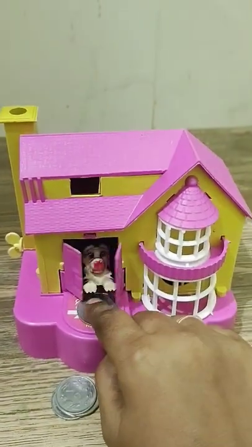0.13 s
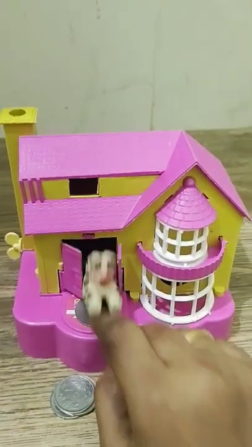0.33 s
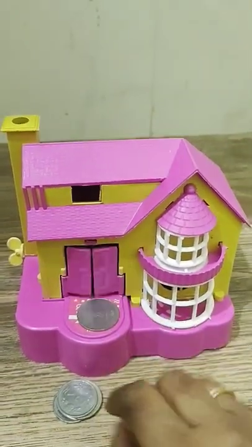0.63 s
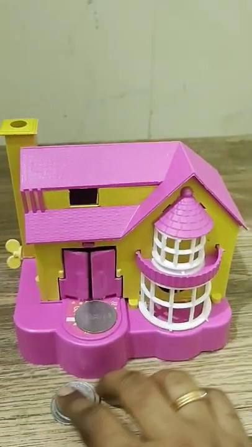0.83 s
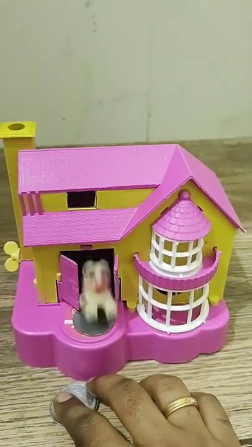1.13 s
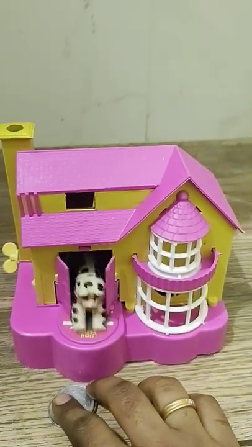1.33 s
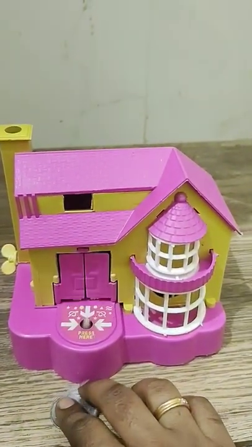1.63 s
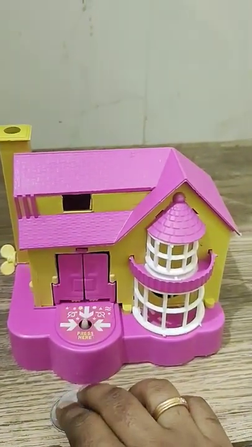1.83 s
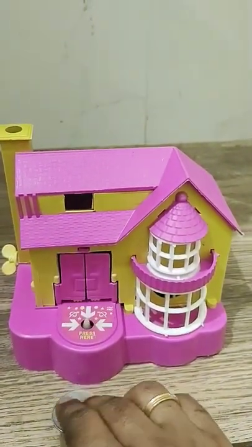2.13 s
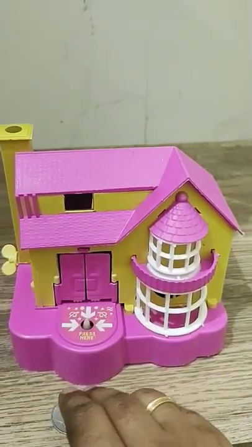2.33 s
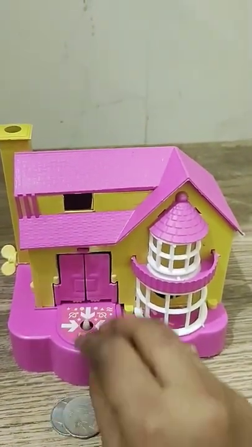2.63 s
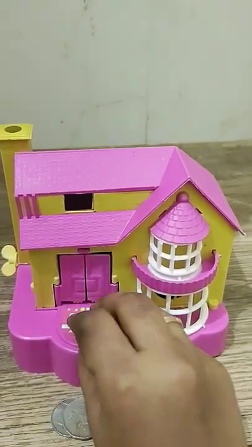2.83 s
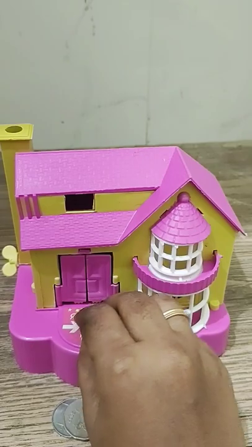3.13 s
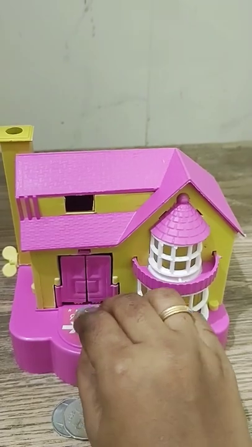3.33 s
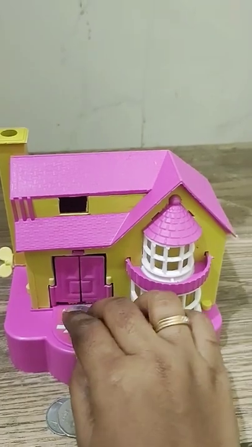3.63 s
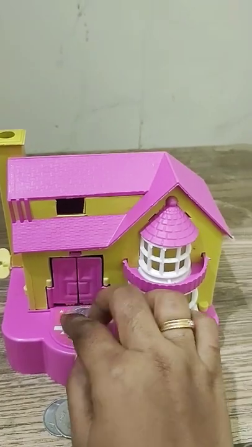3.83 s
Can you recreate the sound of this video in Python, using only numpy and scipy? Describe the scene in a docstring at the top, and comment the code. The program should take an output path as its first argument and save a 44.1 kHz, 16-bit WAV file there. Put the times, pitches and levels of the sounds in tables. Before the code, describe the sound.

A wind-up plastic coin bank whirrs and rattles loudly, its doors clacking, then runs down. Fingers slide and clink coins on a table and set one on the plastic tray, close by in a room with a faint hum.

```python
"""Wind-up coin bank on a table.

A hollow plastic toy runs: a spring drives a fast gear train that rattles the shell, its doors and
figure knock, and it runs down. Then fingers slide and clink coins and set one on the plastic tray.
Room hiss, a low rumble, a fan hum and gusts of air on the microphone lie below."""
import sys
import numpy as np
from scipy import signal
from scipy.fft import rfft, irfft, next_fast_len
from scipy.io import wavfile

SR = 44100
rng = np.random.default_rng(int(sys.argv[2]) if len(sys.argv) > 2 else 0)


def transcribe(u):
    """Save the signal u as a 16-bit wav file named by the first command-line argument.

    u: samples, shape (n,) or (channels, n), limited to [-1, 1]; the rate is SR.
    q: integer samples, one column per channel.
    """
    v = np.clip(np.atleast_2d(u).T, -1, 1)
    q = np.round(v * 32767).astype(np.int16)
    wavfile.write(sys.argv[1], SR, q)


N = 176400
TIME_S = np.arange(N) / SR
BIN_HZ = np.maximum(np.arange(N // 2 + 1) * SR / N, 10)


def amp(db):
    """Decibels to gain."""
    return 10 ** (np.asarray(db) / 20)


def unit_rms(x):
    """Scale to rms 1."""
    return x / np.sqrt(np.mean(x ** 2) + 1e-20)


def envelope(points, at_s=TIME_S):
    """Ride a fader between breakpoints."""
    return np.interp(at_s, *np.transpose(points))


def eq_curve(points):
    """Spread breakpoints over the spectrum on a log frequency axis."""
    hz, values = np.transpose(points)
    return np.interp(np.log(BIN_HZ), np.log(hz), values)


def drift(rate_hz):
    """Smooth random wander, rms about 1."""
    pole = np.exp(-80 * np.pi * rate_hz / SR)
    slow = signal.lfilter([1], [1, -2 * pole, pole * pole], rng.standard_normal(N // 40 + 2002))[2000:]
    return np.interp(np.arange(N) / 40, np.arange(len(slow)), unit_rms(slow))


# How alike left and right sound: freq_hz, correlation
STEREO_LIKENESS = [(60, .998), (125, 1), (250, 0.85), (500, 0.9), (1000, 0.57), (2000, 0.25), (4000, 0.22),
                   (12000, 0.24)]
def coloured(source, colour):
    """Give two unrelated signals an EQ and a stereo width; rms 1."""
    mid, side = rfft(source)
    alike = np.clip(eq_curve(STEREO_LIKENESS), 0, 1)
    stereo = np.sqrt(1 + alike) * mid + np.sqrt(1 - alike) * side * [[1], [-1]]
    low_cut = 1 + (colour[0][0] / BIN_HZ) ** 6
    return unit_rms(irfft(amp(eq_curve(colour)) / low_cut * stereo, N))


def noise(colour):
    """Stereo noise through an EQ; rms 1."""
    return coloured(rng.standard_normal((2, N)), colour)


def resonate(x, peaks, waver_db, waver_hz, order=1):
    """Parallel resonances, each swelling and fading on its own; rms 1."""
    out = 0
    for k, (hz, width_hz, db) in enumerate(peaks):
        r, ring = np.exp(-np.pi * width_hz / SR), x
        for _ in range(order):
            ring = signal.lfilter([1, 0, -1], [1, -2 * r * np.cos(2 * np.pi * hz / SR), r * r], ring)
        out += (-1) ** k * amp(db + waver_db * drift(waver_hz)) * unit_rms(ring)
    return unit_rms(out)


def strike(start_s, db, modes, spread_db, tilt_db=0, chatter_db=-60, chatter_t60_s=.06):
    """Short contacts with a dying chatter ring a set of modes; tilt_db brightens per octave."""
    out = np.zeros((2, N))
    luck = rng.standard_normal((len(start_s), len(modes), 3))
    lag_s = .0003 * rng.random((len(start_s), len(modes)))  # the contact smears the attack
    for k, (hz, mode_db, t60_s) in enumerate(modes):
        onsets = np.minimum((start_s + lag_s[:, k] * np.sqrt(700 / hz)) * SR, N - 1).astype(int)
        scatter_db = spread_db * (luck[:, k, 2] + .32 * luck[:, k, :2].T)  # per hit and per ear
        clicks = np.full((2, N), 1e-18)
        clicks[:, onsets] = (-1) ** k * amp(db + mode_db + tilt_db * np.log2(hz / 700) + scatter_db)
        tail = signal.lfilter([amp(chatter_db)], [1, -amp(-60 / (chatter_t60_s * SR))], clicks)
        force = clicks + tail * rng.standard_normal(N)
        r, w = amp(-60 / (max(t60_s, .003) * SR)), 2 * np.pi * hz / SR
        out += signal.lfilter([0, np.sin(w)], [1, -2 * r * np.cos(w), r * r], force)
    return out


def burst(start_s, db, t60_s, band_hz):
    """A band of noise dying away after each hit."""
    kicks = np.full(N, 1e-18)
    kicks[(start_s * SR).astype(int)] = amp(db)
    decay = signal.lfilter([1], [1, -amp(-60 / (t60_s * SR))], kicks)
    band = signal.butter(2, band_hz, "band", fs=SR, output="sos")
    return decay * signal.sosfilt(band, rng.standard_normal((2, N)))


# Room tone fader: time_s, level_db
HISS_LEVEL = [(1.98, -39), (2.18, -42.5), (2.68, -47.5), (2.94, -50), (3.13, -46.5), (3.3, -45),
              (3.44, -43.5), (3.89, -48.5), (4.0, -49.5)]
# Room tone EQ: freq_hz, gain_db
HISS_COLOUR = [(150, 2), (230, 0.5), (330, 4.5), (500, 4), (800, 3), (1300, 0.5), (2000, -2), (2900, -5.5),
               (3600, -24), (5000, -27), (9000, -36), (16000, -58)]
# Low end of the room: freq_hz, gain_db
RUMBLE_COLOUR = [(15, -10), (30, 9), (50, -18), (62, -7), (80, 15.5), (100, 24), (125, 21.5), (160, 10.5),
                 (200, -25)]
def room_tone():
    """A dull, faintly flickering hiss over a steady rumble."""
    hiss = amp(envelope(HISS_LEVEL) + .6 * drift(5.4)) * noise(HISS_COLOUR)
    return hiss + amp(-54) * noise(RUMBLE_COLOUR)


# Swells of moving air: time_s, level_db
GUST_LEVEL = [(0.0, -33.5), (0.12, -38.5), (0.41, -39.5), (0.46, -28.5), (0.57, -29.5), (0.74, -36.5),
              (0.79, -30), (0.92, -34.5), (1.1, -44), (1.45, -48), (2.1, -49.5), (2.4, -46.5), (3.03, -51),
              (3.07, -34.5), (3.14, -34), (3.25, -35.5), (3.36, -38), (3.45, -34.5), (3.62, -41.5),
              (3.66, -48.5), (3.8, -44), (4.0, -51)]
# Bass-heavy wind EQ: freq_hz, gain_db
GUST_COLOUR = [(15, -40), (30, -17), (50, -11), (60, 2), (68, 11), (82, 3), (99, 10), (120, 2), (150, 1.5),
               (180, -10.5), (220, -14), (400, -11.5), (800, -55)]
def gusts():
    """Air buffets the microphone in low puffs."""
    return amp(envelope(GUST_LEVEL) + .18 * drift(12)) * noise(GUST_COLOUR)


def fan_hum(pitch_hz=199.2, level_db=-49.5):
    """A fan holds one low tone whose level wavers slightly."""
    return np.sqrt(2) * amp(level_db + .4 * drift(16)) * np.sin(2 * np.pi * pitch_hz * TIME_S)


# The rattle, from release to run-down: time_s, level_db
RATTLE_LEVEL = [(0.068, -56), (0.082, -27.5), (0.342, -23.5), (0.422, -25.5), (0.45, -24.5), (0.541, -22),
                (0.685, -24), (0.842, -22), (1.101, -22.5), (1.303, -24.5), (1.396, -20.5), (1.444, -25.5),
                (1.472, -21.5), (1.51, -26), (1.628, -22.5), (1.721, -22), (1.806, -22), (1.855, -25.5),
                (1.89, -35), (1.93, -43), (1.96, -59), (2.0, -70), (2.1, -96)]
# Rattle EQ: freq_hz, gain_db
RATTLE_COLOUR = [(530, -99), (900, -10), (1510, -5.5), (1640, -2), (2220, -4), (5280, -5), (5820, -4),
                 (8660, -9), (14900, -9.5), (16000, -12)]
# Shell resonances the teeth excite: pitch_hz, width_hz, gain_db
SHELL_PEAKS = [(1066, 80, -4), (1440, 50, -4), (1620, 60, 0), (1790, 60, 2), (2510, 70, -3), (2724, 50, -3),
               (3500, 120, -3), (4620, 50, -2), (4970, 60, 2), (5400, 120, -2), (5650, 90, -2),
               (5950, 60, 1), (7430, 90, -12)]
# How hard the load makes the shell ring: time_s, gain_db
SHELL_LOAD = [(0.07, 6), (0.4, -4.5), (0.7, -1.5), (0.85, 3), (1.15, -1), (1.4, -4.5), (1.5, -3),
              (1.75, 1.5), (1.9, 6)]
# Resonances of the hollow body: pitch_hz, width_hz, gain_db
BOOM_PEAKS = [(556, 100, -1), (682, 86, 5), (792, 102, 2), (837, 56, 0.5), (338, 28, -14)]
# The boom, lingering after the stop: time_s, level_db
BOOM_LEVEL = [(0.068, -24), (0.132, -32.5), (0.256, -33), (0.5, -33), (0.842, -32), (0.988, -33),
              (1.2, -34), (1.466, -37), (1.65, -34.5), (1.73, -33.5), (1.82, -36), (1.88, -39),
              (1.95, -43.5), (2.05, -62.5), (2.4, -52.5), (2.75, -66.5), (3.0, -81)]
def gear_train(teeth_per_s=14000):
    """Dense, uneven tooth contacts rattle brightly, ring the shell and make the hollow body boom."""
    start_s = RATTLE_LEVEL[0][0]
    fade_in = np.interp(TIME_S, [start_s, start_s + .0053], [0, 1])
    force_db = 2 * np.minimum(rng.exponential(1, (2, N)), 5)
    teeth = amp(force_db) * rng.choice([-1, 1], (2, N))
    teeth *= rng.random((2, N)) < teeth_per_s / SR
    teeth *= amp(.64 * (drift(22) + drift(135)))  # the level flickers
    drive = coloured(teeth, [(200, 0), (16000, 0)])
    rattle = amp(2) * coloured(teeth, RATTLE_COLOUR)
    shell = amp(envelope(SHELL_LOAD) - 7) * resonate(drive, SHELL_PEAKS, waver_db=3, waver_hz=12)
    boom = amp(envelope(BOOM_LEVEL) + 3) * resonate(drive, BOOM_PEAKS, waver_db=.5, waver_hz=4.7, order=2)
    return fade_in * (amp(envelope(RATTLE_LEVEL)) * (rattle + shell) + boom)


# Knocks on the shell: start_s, level_db, tilt_db_per_octave, thud_offset_db
KNOCKS = [(0.0725, -22, -2, -22), (0.0765, 2, -2, -18), (0.086, -9, -1, -12), (0.118, -13, -4, -13),
          (0.139, -12, 0, -9), (0.258, -16, 0, -9), (0.473, -13, -1, -9), (0.606, -12, 0, -10),
          (0.788, -10, 0, -13), (0.979, -15, 0, -13), (1.3665, -8, -4, -23), (1.3705, -14, 5, -20),
          (1.3765, -7, -4, -23), (1.405, -15, 0, -22), (1.459, -15, -1, -17), (1.750, -3, 0, -7),
          (1.760, -17, 3, -8), (1.7845, -14, 4, 0), (1.788, -15, 4, -8), (1.798, -5, -2, -14),
          (1.848, -14, -2, -12), (1.902, -10, -3, -15)]
# Dry ring of struck plastic: pitch_hz, gain_db, t60_s
SHELL_MODES = [(500, -12, .02), (684, 0, .03), (800, -2, .025), (1040, -8, .025), (1300, -9, .02),
               (1610, -7, .025), (2000, -9, .02), (2500, -9, .02), (3000, -11, .015), (3500, -12, .015),
               (4200, -15, .012), (4950, -17, .01)]
# Thud of the doors: pitch_hz, gain_db, t60_s
DOOR_MODES = [(325, -10, .045)]
def knocks():
    """Doors, figure and catch hit their stops: the shell clacks and the doors thud."""
    start_s, db, tilt_db, thud_db = np.transpose(KNOCKS)
    clack = strike(start_s, db - 6.5, SHELL_MODES, spread_db=-.5, tilt_db=tilt_db)
    return clack + strike(start_s, db + thud_db, DOOR_MODES, spread_db=-2)


def loose_parts(ticks_per_s=70):
    """Small parts tick against the shell while the gears run, following the level of the boom."""
    start_s = np.arange(RATTLE_LEVEL[0][0], RATTLE_LEVEL[-1][0], 1 / ticks_per_s)
    start_s += rng.uniform(0, 1 / ticks_per_s, len(start_s))
    return strike(start_s, envelope(BOOM_LEVEL, start_s) - 5.5, SHELL_MODES, spread_db=5.5, tilt_db=-3)


# Sliding strokes: time_s, level_db
RUB_LEVEL = [(1.95, -78), (2.1, -77), (2.19, -66), (2.27, -89), (2.32, -56), (2.34, -58.5), (2.44, -62.5),
             (2.6, -64), (2.7, -74), (3.04, -80), (3.12, -57), (3.25, -58.5), (3.36, -71), (3.47, -59),
             (3.56, -57), (3.7, -69), (4.0, -81.5)]
# Friction EQ: freq_hz, gain_db
RUB_COLOUR = [(2500, 1), (4500, 1), (6500, -6), (9000, -4.5), (12000, -32), (16000, -18)]
# Treble shelf, brighter for coins on wood than for skin on plastic: time_s, gain_db
RUB_TREBLE = [(2.0, 1), (2.5, 2), (2.9, -13), (4.0, -19)]
def rubbing():
    """Fingers and coins slide over table and tray with a grainy hiss."""
    friction = noise(RUB_COLOUR)
    dull = signal.sosfilt(signal.butter(2, 8000, fs=SR, output="sos"), friction)
    treble = amp(envelope(RUB_TREBLE)) * (friction - dull)
    return amp(envelope(RUB_LEVEL) + 1.3 * drift(30)) * (dull + treble)


# Coin meets coin: start_s, level_db, ring_offset_db
CLINKS = [(2.318, -53, -1), (2.348, -30, -5), (2.358, -46, 0), (2.440, -56, 2), (2.498, -29.5, 6),
          (2.508, -40.5, 4), (2.521, -40, 3), (2.534, -38, 7)]
# High ring of a coin: pitch_hz, gain_db, t60_s
COIN_MODES = [(4500, -19, .01), (5900, -24, .01), (7400, -18, .012), (8300, -14, .012), (9100, -8, .012),
              (9750, -6, .015), (10250, -7, .012), (10700, -7, .012), (11170, -8, .015), (11650, -10, .11),
              (11740, -13, .06), (13000, -11, .01), (14200, -12, .01), (15200, -14, .01)]
def coin_clinks():
    """Coins touch with a sharp crack, a ring and a sizzling metallic tail."""
    start_s, db, ring_db = np.transpose(CLINKS)
    ring = strike(start_s, db + ring_db - 11, COIN_MODES, spread_db=3.5, chatter_db=-17)
    crack = burst(start_s, db - 5, t60_s=.012, band_hz=(7000, 16000))
    sizzle = burst(start_s, db + ring_db - 12, t60_s=.18, band_hz=(8800, 12900))
    return ring + crack + sizzle


# Coin meets tray: start_s, level_db, tilt_db_per_octave
TRAY_TAPS = [(3.519, -19.5, 1), (3.5233, -28, -2.5), (3.985, -30.5, -1.5)]
# Short ring of the tray: pitch_hz, gain_db, t60_s
TRAY_MODES = [(780, -4, .02), (1260, -9, .018), (1750, -13, .012), (2150, -11, .012), (2450, -4, .012),
              (2680, 0, .015), (2900, -6, .015), (3300, -12, .012), (4000, -16, .012), (4800, -19, .01),
              (6000, -20, .008)]
def tray_taps():
    """A coin is set down: the plastic tray clicks, with a faint bright tail."""
    start_s, db, tilt_db = np.transpose(TRAY_TAPS)
    click = strike(start_s, db - 5.5, TRAY_MODES, spread_db=3.5, tilt_db=tilt_db, chatter_db=-28)
    return click + burst(start_s, db - 24, t60_s=.11, band_hz=(2300, 11000))


def reverb(x, t60_s=.35, wall_cut_hz=6000):
    """Wall echoes as feedback delays, ten a side, duller on every round."""
    size = next_fast_len(N + SR)
    hz = np.arange(size // 2 + 1) * SR / size
    damping = 1 / (1 + 1j * hz / wall_cut_hz)
    response = np.zeros((2, len(hz)), complex)
    for k, lag_s in enumerate(rng.uniform(.007, .037, 20)):
        loop = amp(-60 * lag_s / t60_s) * damping * np.exp(-2j * np.pi * hz * lag_s)
        response[k % 2] += (-1) ** (k // 2) * loop / (1 - loop)
    return irfft(response * rfft(x, size), size)[:, :N]


def scene():
    """Toy and coins over the background; only the hits feed the reverb."""
    low_cut = signal.butter(4, 315, "high", fs=SR, output="sos")
    hits = signal.sosfilt(low_cut, knocks() + loose_parts() + coin_clinks() + tray_taps())
    return gear_train() + hits + amp(-17) * reverb(hits) + room_tone() + rubbing() + gusts() + fan_hum()


# Stereo balance: freq_hz, left_minus_right_db
MIC_BALANCE = [(60, 0.5), (110, 0.0), (200, -1), (380, -3.5), (700, 3), (1290, 0.5), (2380, -1.5),
               (4400, -4.5), (8120, -2), (15000, -0.5)]
# Phase between the microphones: freq_hz, left_lead_rad
MIC_PHASE = [(150, 0), (300, 0.38), (500, 1.4), (800, 0.18), (1200, 1.38), (2500, 1.1), (5000, 1.42)]
def record(dry, ceiling=.85, cutoff_hz=16000):
    """Two microphones of unequal colour and phase; peaks are rounded, the top is cut."""
    side = np.array([[.5], [-.5]])
    mics = amp(eq_curve(MIC_BALANCE) * side) * np.exp(1j * eq_curve(MIC_PHASE) * side)
    rounded = ceiling * np.tanh(irfft(rfft(dry) * mics, N) / ceiling)
    return signal.sosfilt(signal.cheby2(16, 60, cutoff_hz, fs=SR, output="sos"), rounded)


dry = scene()
out = record(dry)
transcribe(out)
```